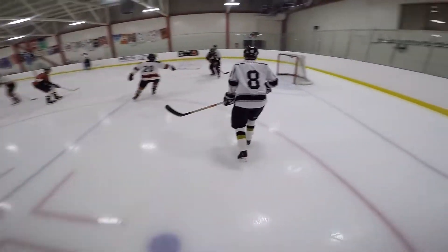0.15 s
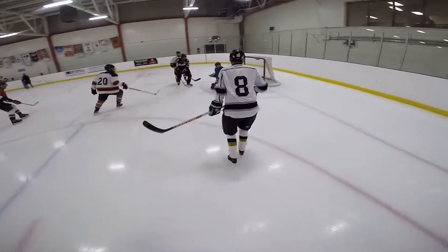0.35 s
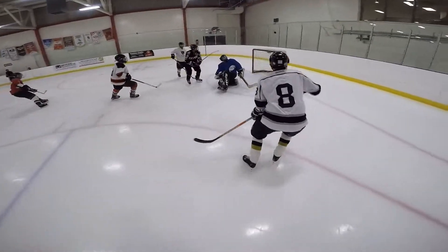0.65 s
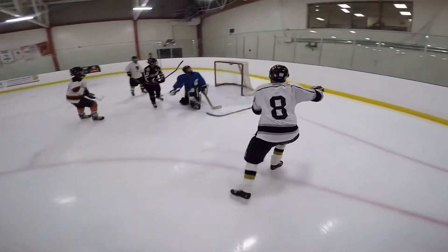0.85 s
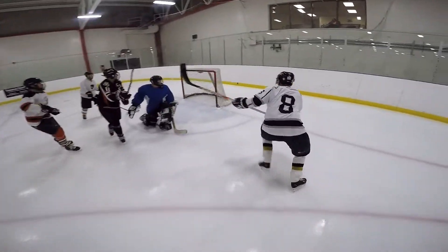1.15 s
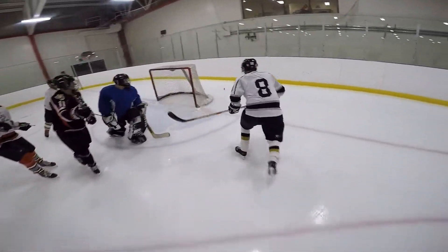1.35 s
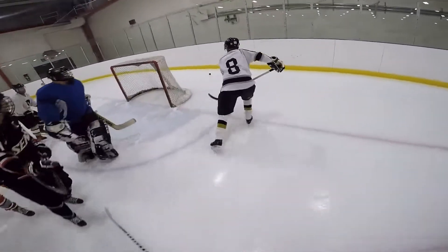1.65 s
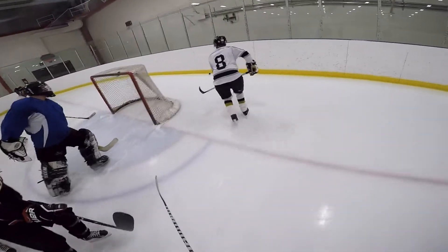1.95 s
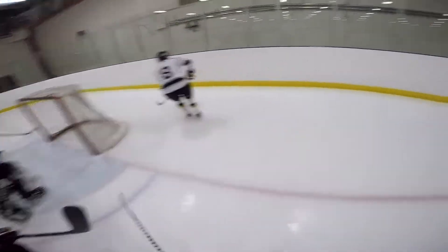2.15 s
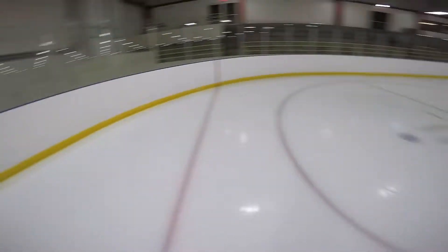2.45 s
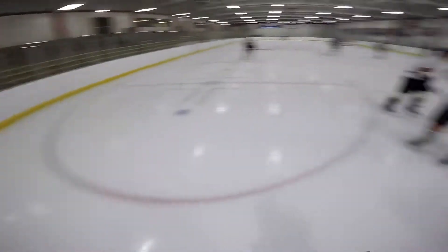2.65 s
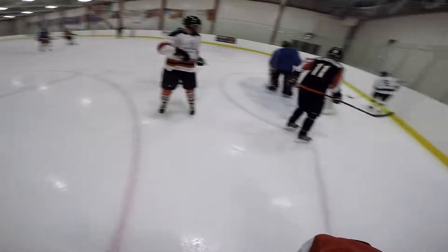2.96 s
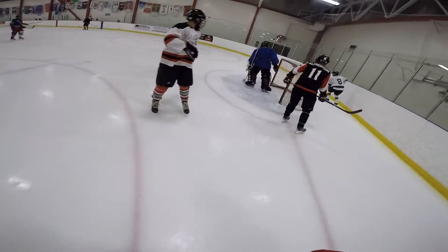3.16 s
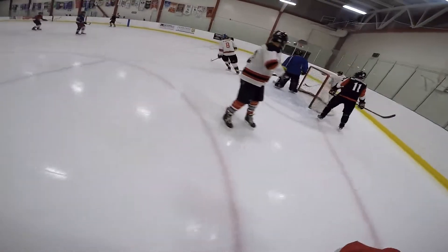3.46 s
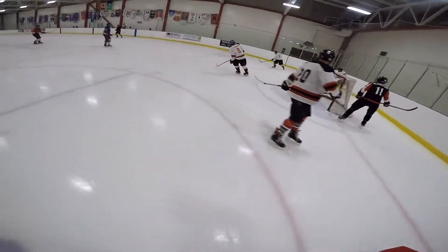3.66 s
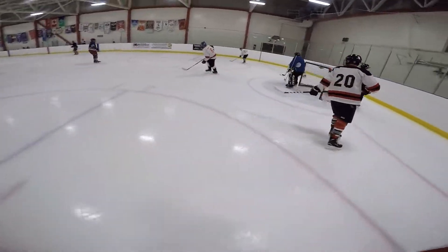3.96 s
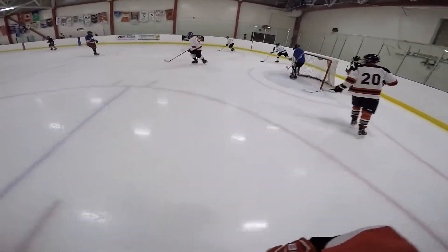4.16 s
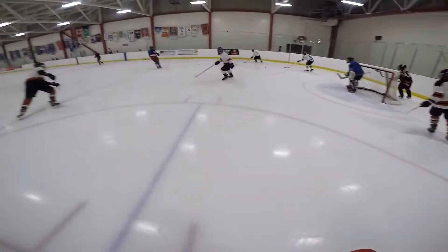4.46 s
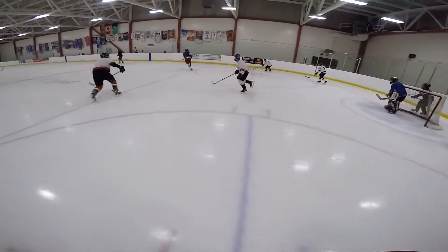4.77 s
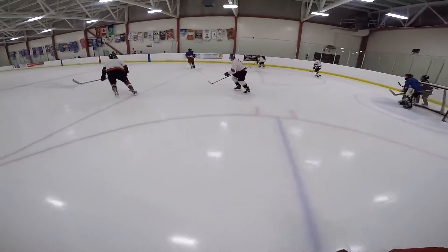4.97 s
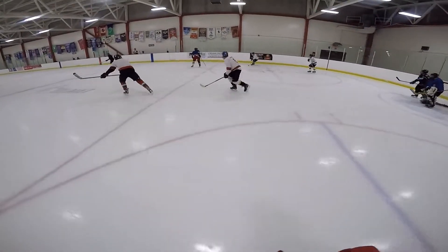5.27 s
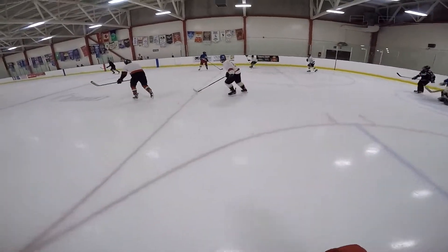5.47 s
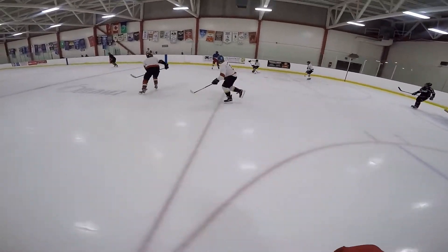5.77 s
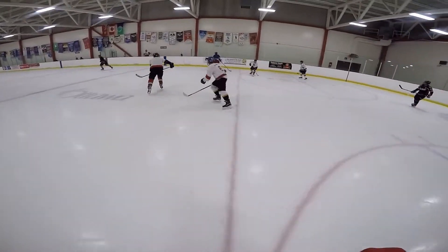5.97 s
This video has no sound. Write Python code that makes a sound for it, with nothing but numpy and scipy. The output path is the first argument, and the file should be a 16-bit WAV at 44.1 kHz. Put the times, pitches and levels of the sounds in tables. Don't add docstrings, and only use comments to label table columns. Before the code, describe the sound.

Ice skates scrape and carve in an echoing rink while low wind buffets the microphone, with a sharp stick clack early and another slap near five seconds.

```python
import sys
import numpy as np
from scipy import signal
from scipy.fft import rfft, irfft, next_fast_len
from scipy.io import wavfile
from scipy.ndimage import uniform_filter1d, map_coordinates

SR = 44100
rng = np.random.default_rng(int(sys.argv[2]) if len(sys.argv) > 2 else 0)


def pcm_store(signal):
    levels = np.round(np.clip(np.atleast_2d(signal), -1, 1) * 32767)
    wavfile.write(sys.argv[1], SR, levels.astype(np.int16).T)


def natural_amplitude(level_db):
    exponent = np.asarray(level_db, float) / 20
    return 10 ** exponent


N = 269892

# (frequency [Hz], level [dB per Hz])
HUM_TONE = [(76, -15), (130, -3), (150, -9.5), (194, -8.5), (227, -11), (432, -20.5), (565, -21),
            (850, -22), (1100, -18.5), (1870, -120)]
HUM_DB = -41.5
HUM_FOLLOWS = 0.55
# (time [s], strength [dB], lean towards small eddies [dB])
AIR_STREAM = [(0, -34.5, 1), (.5, -40, 0.5), (1, -39.5, -1.5), (1.15, -39, 7), (1.7, -32.5, 4),
              (1.95, -42, 7.5), (2.3, -32, -1.5), (2.7, -37, 3.5), (2.95, -36.5, 0.5), (3.1, -41.5, 2.5),
              (3.55, -39.5, 0), (3.66, -41, 4.5), (3.76, -43, -1), (4.1, -35.5, -1), (4.7, -37, 4),
              (5.3, -36, 2), (5.7, -42, 2), (6.12, -31.5, 4)]
# (frequency [Hz], level [dB per Hz])
BUFFET_TONE = [(4.7, -14), (8.0, 5.5), (22, 1.5), (50, -1.5), (107, -13.5), (135, -19), (180, -25),
               (300, -120)]
# (lowest [Hz], highest [Hz])
EDDY_RANGES = [(0, 42), (42, 70), (70, 135)]
EDDY_LEVELS = (5, -1, -3.5)
EDDY_LEANS = (-0.43, 0.27, 0.91)
# (time [s], half length [s], peak [dB])
LARGE_EDDY_GUSTS = [(0.54, 0.073, -27), (1.796, 0.039, -26.5), (2.392, 0.031, -20.5), (2.514, 0.042, -17.5),
                    (3.193, 0.15, -28), (3.446, 0.044, -27.5), (4.064, 0.02, -27), (4.122, 0.066, -20.5),
                    (4.291, 0.026, -19.5), (4.467, 0.054, -21), (5.096, 0.063, -21), (5.146, 0.009, -33),
                    (5.54, 0.036, -23), (5.799, 0.033, -23.5), (5.964, 0.071, -27), (6.095, 0.016, -35)]
# (time [s], half length [s], peak [dB])
MIDDLE_EDDY_GUSTS = [(0.127, 0.015, -27.5), (0.422, 0.043, -29), (0.78, 0.073, -23), (1.025, 0.035, -25.5),
                     (1.723, 0.042, -24.5), (2.308, 0.034, -26), (2.551, 0.063, -25.5), (3.85, 0.045, -28),
                     (4.039, 0.053, -27), (2.2, 0.044, -33), (4.447, 0.065, -26.5), (5.156, 0.042, -27.5),
                     (5.492, 0.034, -22.5), (5.619, 0.026, -27)]
# (time [s], half length [s], peak [dB])
SMALL_EDDY_GUSTS = [(0.755, 0.077, -41), (1.213, 0.021, -22.5), (1.549, 0.018, -32.5), (1.655, 0.03, -24),
                    (1.739, 0.027, -22), (1.957, 0.031, -29.5), (2.297, 0.023, -30), (2.546, 0.028, -28.5),
                    (2.637, 0.026, -27), (2.714, 0.035, -25), (2.925, 0.041, -28.5), (4.39, 0.1, -31.5),
                    (5.735, 0.066, -30.5)]
# (time [s], half length [s], peak [dB])
AIR_LUMP = (6.1185, 0.0054, -13)
# (time [s], activity [dB], nearness of the cutting edges [dB])
SKATING = [(0, -37, 2), (.13, -35.5, -1.5), (.2, -30.5, -1), (.4, -35, -2), (.8, -35.5, -1.5),
           (1.4, -39.5, 1), (1.6, -37, 0), (2.36, -39, 1), (2.65, -37.5, 2), (2.96, -39, -0.5),
           (3.93, -41, -1.5), (4.2, -39, 1.5), (4.4, -40, -1.5), (5.12, -40.5, 2), (5.2, -35.5, 4),
           (5.3, -38, 2), (5.6, -38.5, -1), (6.12, -38.5, -1.5)]
# (lowest [Hz], highest [Hz])
SCRAPE_RANGES = [(0, 2300), (2300, 4900), (4900, 9500), (9500, 15200)]
SCRAPE_LEVELS = (0, -6, -14.5, -31.5)
SCRAPE_NEARNESS = (0, .7, 1.3, 1.4)
# (frequency [Hz], level [dB per Hz])
HOUSING_TONE = [(450, -23.5), (760, -14.5), (1120, -0.5), (1920, -3), (2120, -6), (3060, -5.5), (3600, -7),
                (4180, -12.5), (5240, -24), (6400, -22), (7820, -34), (8760, -33.5), (15200, -48)]
# (centre [Hz], width [Hz], lift [dB])
CAVITY_RESONANCES = [(1430, 56, 6), (1782, 190, 3.5), (3588, 240, 7.5), (6280, 310, 4), (8800, 400, 2.5),
                     (13400, 2600, 10)]
# (time [s], length [s],
# centre [Hz], level [dB])
SINGLE_STROKES = [(.161, 0.84, 2420, -36), (.984, 0.026, 2610, -32.5), (.985, 0.0065, 7050, -34.5),
                  (1.895, 0.069, 3700, -38), (1.935, 0.18, 3960, -41), (1.898, 0.16, 6400, -50),
                  (1.9, 0.11, 12000, -60), (2.74, 0.13, 2510, -40), (5.165, 0.65, 2510, -38.5),
                  (5.175, 0.24, 6330, -51), (5.955, 0.1, 6850, -50)]
# (time [s], length [s], centre [Hz], level [dB])
EDGE_SQUEALS = [
    (0, 0.17, 307, -46),
    (1.87, 0.053, 6550, -44.5),
    (2.155, 0.048, 584, -43),
    (2.626, 0.039, 620, -39),
    (2.738, 0.23, 3620, -44.5),
    (4.483, .19, 204, -42.5),
    (5.003, 0.043, 584, -45),
]
# (time [s], length [s], centre [Hz], level [dB])
SNOW_SPRAYS = [
    (1.595, 0.3, 5300, -52),
    (3.46, .1, 5440, -48),
    (3.56, 0.18, 4970, -50),
    (4.16, 0.1, 5400, -52),
    (4.549, .12, 4430, -49),
]
SNOW_SPREAD = .6
# (time [s], peak [dB], pitch [Hz], 60 dB decay [s])
BOARD_THUDS = [
    (0.138, -9.5, 233, 0.032),
    (1.299, -26, 218, 0.13),
    (1.924, -24, 176, 0.024),
    (2.179, -49, 262, 0.027),
    (4.329, -17, 187, 0.029),
    (5.017, -23.5, 271, 0.056),
]
# (lowest [Hz], highest [Hz])
CONTACT_RANGES = [(0, 4900), (4900, 15200)]
# (frequency [Hz], 60 dB decay [s])
HALL_DECAY = [(800, 9.3), (2000, 1.1), (4000, 2.9), (8000, 0.77), (14000, 0.75)]
# (time [s], peak [dB], ring [Hz], tick under the peak [dB], 60 dB decay [s])
FAR_TAPS = [
    (2.1935, -30, 1370, -68, 0.014),
    (2.6934, -33.5, 1270, -30, 0.024),
    (4.0711, -28, 1800, -12, 0.027),
    (4.1715, -31, 1680, -7, 0.025),
    (4.4313, -47, 1400, -23, .02),
]
# (time [s], peak [dB], ring [Hz], tick under the peak [dB], 60 dB decay [s])
DISTANT_BITES = [(0.4733, -24, 4900, -1, 0.03), (0.5113, -31, 4600, -2, 0.022),
                 (1.3, -29.5, 4830, -1.5, .014), (1.9138, -27.5, 4500, -26, 0.024),
                 (1.927, -22.5, 3620, -14, 0.028), (2.491, -56, 4090, -13, 0.021),
                 (3.855, -54, 4770, -4, .012), (3.915, -49, 6200, -3, .012), (4.037, -45, 6340, 10, 0.029),
                 (4.159, -25, 3400, -18, 0.018), (4.52, -34, 3930, -12, .025),
                 (5.603, -30, 3850, -18, 0.02), (5.9604, -33, 3940, -2, .03)]
# (time [s], peak [dB], ring [Hz], tick under the peak [dB], 60 dB decay [s])
NEAR_BITES = [
    (.9852, -23, 4580, -5.5, 0.03),
    (.9994, -35, 4450, 3, .02),
    (1.0196, -37, 4090, 4, 0.026),
    (1.9015, -24, 4220, -8, 0.026),
    (5.014, -41, 4500, -17, .02),
]
# (time [s], peak [dB], ring [Hz], tick under the peak [dB], 60 dB decay [s])
STICK_SLAPS = [
    (5.1315, -39, 8850, 2, 0.013),
    (5.139, -21, 3500, 0.5, 0.0059),
    (5.1573, -21, 3470, -3, .008),
    (5.1613, -14.5, 3340, -9.5, 0.013),
    (5.168, -19, 3500, -11, 0.066),
    (5.1745, -26, 8700, -5, 0.0046),
    (5.206, -24, 1640, -21, 0.075),
    (5.2145, -19, 3330, -27, 0.012),
    (5.3362, -21.5, 4300, -0.5, 0.0093),
]
# (time [s], peak [dB], ring [Hz], tick under the peak [dB], 60 dB decay [s])
STICK_CLACKS = [
    (.1228, -15, 1700, -4.5, 0.0088),
    (.139, -26, 1530, -55, 0.054),
    (.1427, -10.5, 2100, -11, 0.033),
    (.1567, -12.5, 1560, -16, 0.062),
    (.1665, -14, 1360, -40, 0.078),
]
# (time [s], peak [dB], ring [Hz], time to peak [s])
HIT_PINGS = [(.1222, -12.5, 1660, 0.0011), (0.1243, -18, 3560, .0008), (.1425, -29, 6560, 0.00086),
             (.1442, -30, 3440, .001), (0.1543, -14, 1690, 0.0012), (0.158, -16, 3100, .0015),
             (.1605, -35, 7000, .001), (0.1697, -19, 1400, 0.0025), (.6812, -37, 4600, .001),
             (.7795, -39, 4740, .001), (.8972, -35, 4500, .001), (0.9863, -28, 7660, 0.0009),
             (.99, -32, 6500, 0.00092), (.991, -45, 13000, .0015), (.9995, -45, 13300, .0015),
             (1.0185, -42, 6200, .001), (1.019, -42, 8850, .001), (1.3492, -44, 6350, .001),
             (1.5872, -42, 4510, .001), (1.607, -35, 4610, .001), (1.9603, -33, 4760, .001),
             (2.0007, -38, 4800, .001), (2.0561, -38, 4600, .001), (5.14, -35, 5540, 0.00031),
             (5.1425, -26, 3420, .001), (5.147, -24, 3530, 0.0012), (5.1572, -44, 10500, .0003),
             (5.1615, -43, 12100, .0005), (5.1615, -33, 6800, .0004), (5.1715, -26, 3400, 0.0013),
             (5.172, -24.5, 1910, .003), (5.18, -37, 6600, .0007), (5.187, -39, 6500, 0.00064),
             (5.1915, -38, 6500, 0.00065), (5.2255, -38, 6400, 0.00064), (5.229, -31.5, 1420, .012),
             (5.265, -35, 1430, .01), (5.3383, -18, 3870, 0.00028), (5.3364, -28, 5740, .0004),
             (5.336, -38, 9400, .0004), (5.345, -33, 1424, 0.016), (5.8964, -44, 6300, .001),
             (0.1576, -11, 1900, 0.0005), (1.9018, -26, 3800, .001), (1.9025, -48, 13800, .0003),
             (1.9022, -44, 9800, .0003), (1.904, -33, 4900, 0.0011), (2.1941, -29, 1370, 0.0015),
             (2.6938, -23.5, 1220, 0.0018), (2.6946, -26, 1800, 0.0012)]


def unit(x):
    return x / np.sqrt(np.mean(np.abs(x) ** 2) + 1e-20)


def along(points, hz):
    f, value = np.transpose(points)
    return np.interp(np.log(hz + 1), np.log(f + 1), value)


def curves(rows):
    times, *columns = np.transpose(rows)
    return [np.interp(np.arange(N) / SR, times, column) for column in columns]


def wobble(rate):
    return map_coordinates(rng.standard_normal(N // 100), [np.arange(N) * rate / SR])


def filtered(x, response):
    size = next_fast_len(x.shape[-1] + 8192)
    spectrum = rfft(x, size) * response(np.fft.rfftfreq(size, 1 / SR))
    return irfft(spectrum, size)[..., :x.shape[-1]]


def band(hz, edges):
    low, high = edges
    return 1 / np.sqrt((1 + (low / (hz + 1)) ** 12) * (1 + (hz / high) ** 12))


def patchy(depth_db):
    z = signal.stft(rng.standard_normal(N), nperseg=512)[2]
    patches = uniform_filter1d(rng.standard_normal(z.shape), size=6, axis=0)
    patches = uniform_filter1d(patches, size=12, axis=1)
    return signal.istft(z * natural_amplitude(depth_db * unit(patches)), nperseg=512)[1][:N]


def add_at(out, s, sound):
    out[round(s * SR):][:len(sound)] += sound


def gust_shape(s, half_s, db):
    return natural_amplitude(db) * np.exp(-((np.arange(N) / SR - s) / half_s) ** 2)


def housing(edges):
    hz = np.fft.rfftfreq(4096, 1 / SR)
    lift_db = sum(db / (1 + (2 * (hz - centre) / width) ** 2) for centre, width, db in CAVITY_RESONANCES)
    loudness = natural_amplitude(along(HOUSING_TONE, hz) + lift_db) * band(hz, edges)
    cepstrum = irfft(np.log(loudness + 1e-6))
    cepstrum[1:2048] *= 2
    cepstrum[2049:] = 0
    response = irfft(np.exp(rfft(cepstrum)))
    return response / np.linalg.norm(response)


def hall_hum():
    hum = filtered(patchy(depth_db=1.0), lambda hz: natural_amplitude(along(HUM_TONE, hz)))
    activity_db = curves(SKATING)[0]
    return natural_amplitude(HUM_DB + HUM_FOLLOWS * (activity_db - activity_db.mean())) * unit(hum)


def air_buffeting():
    out = -gust_shape(*AIR_LUMP)
    stream_db, lean_db = curves(AIR_STREAM)
    all_gusts = (LARGE_EDDY_GUSTS, MIDDLE_EDDY_GUSTS, SMALL_EDDY_GUSTS)
    for gusts, eddy_db, share, edges in zip(all_gusts, EDDY_LEVELS, EDDY_LEANS, EDDY_RANGES):
        push = filtered(rng.standard_normal(N), lambda hz: natural_amplitude(along(BUFFET_TONE, hz)) * band(hz, edges))
        swing = uniform_filter1d(np.abs(signal.hilbert(push)), size=3000)
        steady = natural_amplitude(stream_db + eddy_db + share * lean_db + 2.4 * wobble(rate=12))
        swell = np.maximum(steady, sum(gust_shape(*gust) for gust in gusts))
        out += swell * unit(push / swing ** 1.1)
    return out


def blade_scrapes():
    chip_db = np.minimum(4 * rng.exponential(size=N), 12) + 3 * wobble(rate=25)
    torn = rng.random(N) < 1200 / SR
    chips = unit(torn * rng.standard_normal(N) * natural_amplitude(chip_db))
    chatter = wobble(rate=14)
    out = np.zeros(N)
    activity_db, near_db = curves(SKATING)
    grains, chatters_db = (.15, .25, .35, .4), (.5, .7, .8, .9)
    layers = zip(SCRAPE_LEVELS, SCRAPE_NEARNESS, SCRAPE_RANGES, grains, chatters_db)
    for layer_db, share, edges, grain, chatter_db in layers:
        level_db = activity_db + layer_db + share * near_db
        ice = unit(patchy(depth_db=0.9)) + grain * chips
        scrape = signal.fftconvolve(ice, housing(edges))[:N]
        out += natural_amplitude(level_db + chatter_db * (chatter + wobble(rate=18))) * unit(scrape)
    return out


def strokes(rows, spread):
    out = np.zeros(N + SR)
    rough = wobble(rate=73)
    for s, length, centre_hz, db in rows:
        u = np.clip(np.arange(SR * 3 // 4) / SR / length, 0, 1)
        rasp = filtered(rng.standard_normal(len(u)),
                        lambda hz: 1 / (1 + (2 * (hz / centre_hz - 1) / spread) ** 2))
        pressure = 2.24 * np.sqrt(u) * (1 - u) ** 1.35
        add_at(out, s, natural_amplitude(db) * pressure * unit(rasp))
    return natural_amplitude(2.1 * rough) * out[:N]


def board_thuds():
    t = np.arange(SR // 4) / SR
    out = np.zeros(N + SR)
    for s, db, hz, t60 in BOARD_THUDS:
        ring = np.sin(2 * np.pi * hz * t) + 0.55 * np.sin(2 * np.pi * 1.47 * hz * t)
        fade = natural_amplitude(db - 60 * t / max(t60, .01))
        add_at(out, s, fade * (1 - np.exp(-t / 0.0098)) * ring)
    return out[:N]


def hall_tail():
    hz, lag, z = signal.stft(rng.standard_normal(3 * SR // 2), SR, nperseg=256)
    rise = np.clip(lag / 0.011, 0, 1)
    fade = natural_amplitude(-60 * lag / along(HALL_DECAY, hz)[:, None])
    tail = signal.istft(z * rise * fade, SR, nperseg=256)[1]
    return tail / np.linalg.norm(tail)


def hits(rows, knock_db, hall_db, rise_s=0.00018, crack=7.3):
    t = np.arange(SR // 10) / SR
    out = np.zeros(N + 3 * SR)
    for s, peak_db, ring_hz, tick_db, t60 in rows:
        mode = natural_amplitude(-60 * t / 0.0047) * (1 - np.exp(-t / 0.00021)) * np.sin(2 * np.pi * ring_hz * t)
        colours = [mode / np.linalg.norm(mode)] + [housing(edges) for edges in CONTACT_RANGES]
        burst = np.sign(rng.standard_normal(len(t))) * natural_amplitude(-60 * t / max(t60, .002))
        burst *= 1 - np.exp(-t / rise_s)
        burst[0] = crack
        parts = [signal.fftconvolve(burst, colour)[:len(t)] for colour in colours]
        levels_db = (0, knock_db, tick_db)
        parts = [natural_amplitude(peak_db + db) * part / np.abs(part).max() for db, part in zip(levels_db, parts)]
        tail = hall_tail()
        blend = sum(np.linalg.norm(part) * colour[:4096] for part, colour in zip(parts, colours))
        add_at(out, s, sum(parts))
        add_at(out, s, signal.fftconvolve(blend, natural_amplitude(hall_db) * tail))
    return out[:N]


def far_contacts():
    far = hits(STICK_CLACKS, knock_db=-2, hall_db=-2.0)
    far += hits(STICK_SLAPS, knock_db=-5.5, hall_db=-3.5, rise_s=0.00084, crack=2.8)
    far += hits(FAR_TAPS + DISTANT_BITES, knock_db=2.0, hall_db=-9.0)
    return filtered(far, lambda hz: 1 / (1 + (hz / 11500) ** 4))


def near_bites():
    return hits(NEAR_BITES, knock_db=-5, hall_db=-13, rise_s=0.0012, crack=0.58)


def hit_pings():
    t = np.arange(SR // 10) / SR
    out = np.zeros(N + SR)
    for s, db, hz, peak_s in HIT_PINGS:
        u = t / max(peak_s, .0002)
        swell = (u * np.exp(1 - u)) ** 2
        add_at(out, s, natural_amplitude(db) * swell * np.sin(2 * np.pi * hz * t))
    return out[:N]


def scene():
    contacts = filtered(far_contacts() + near_bites(), lambda hz: band(hz, (750, 20000)))
    scrapes = strokes(SINGLE_STROKES, spread=0.33)
    scrapes += strokes(EDGE_SQUEALS, spread=0.17)
    scrapes += strokes(SNOW_SPRAYS, spread=SNOW_SPREAD)
    background = hall_hum() + air_buffeting()
    return (background + blade_scrapes() + scrapes + board_thuds() + contacts + hit_pings())[None]


def roll_off(x):
    return signal.sosfilt(signal.butter(12, 15630, fs=SR, output="sos"), x)


def record(dry):
    kept = filtered(dry, lambda hz: hz < 15250)
    return roll_off(kept)


dry = scene()
out = record(dry)
pcm_store(out)
```